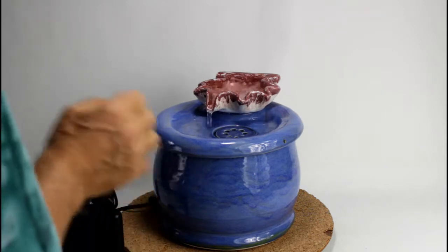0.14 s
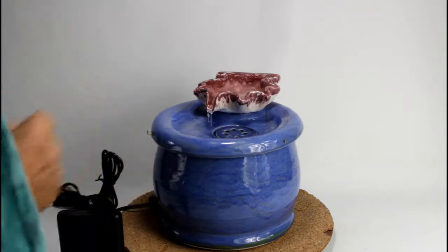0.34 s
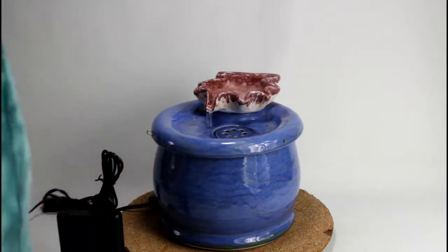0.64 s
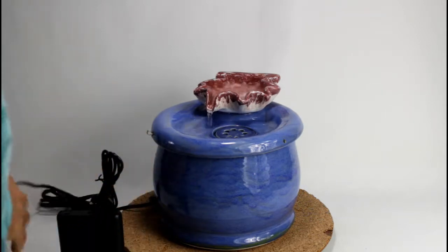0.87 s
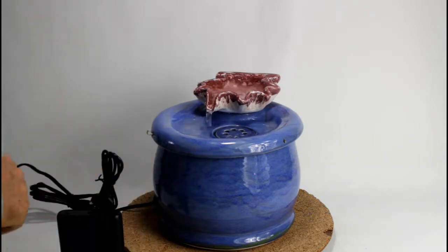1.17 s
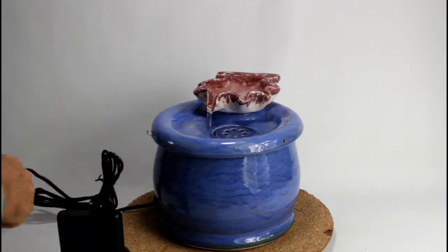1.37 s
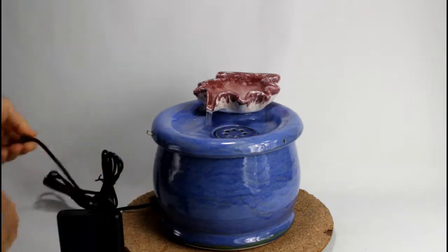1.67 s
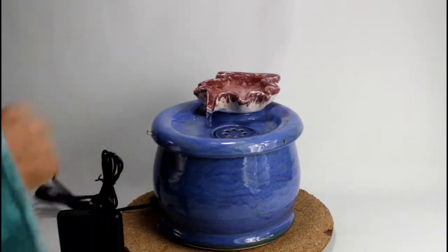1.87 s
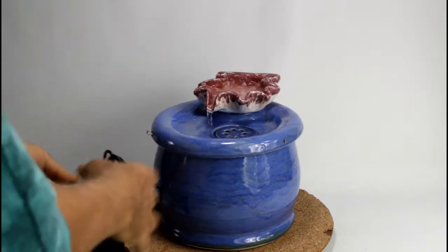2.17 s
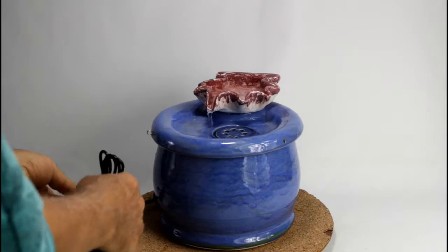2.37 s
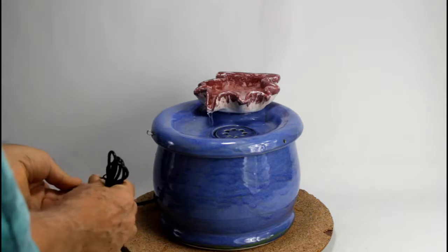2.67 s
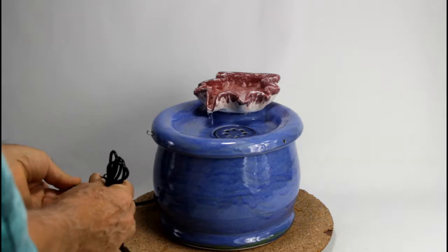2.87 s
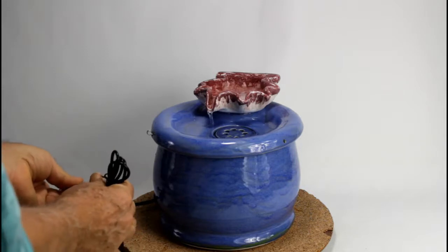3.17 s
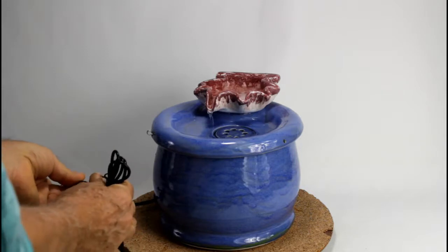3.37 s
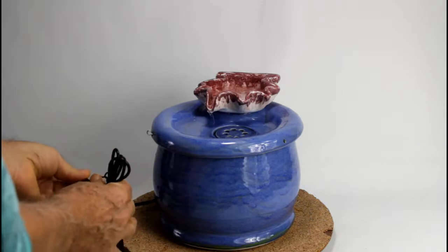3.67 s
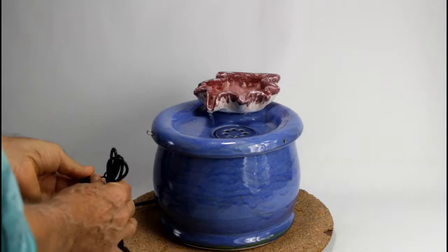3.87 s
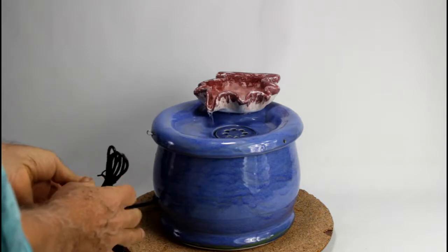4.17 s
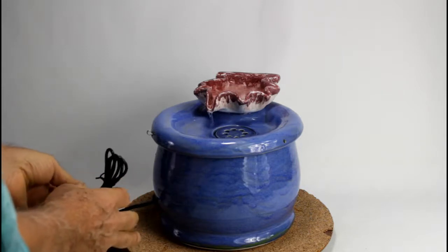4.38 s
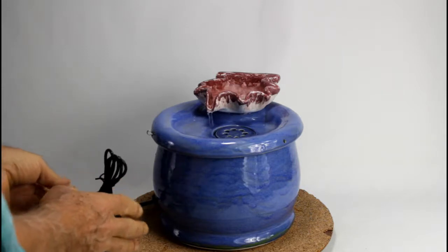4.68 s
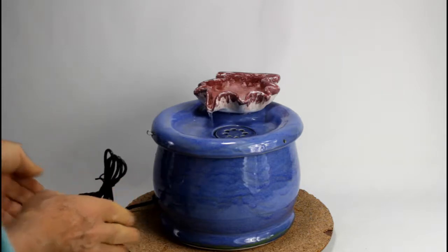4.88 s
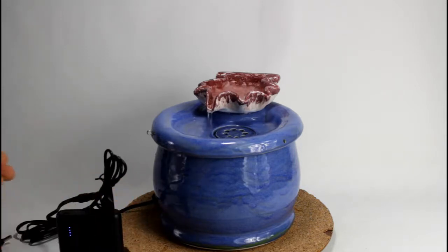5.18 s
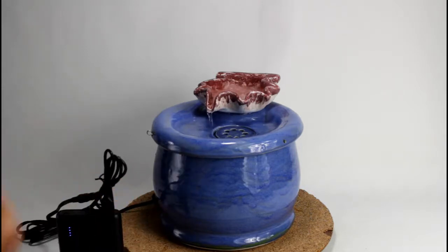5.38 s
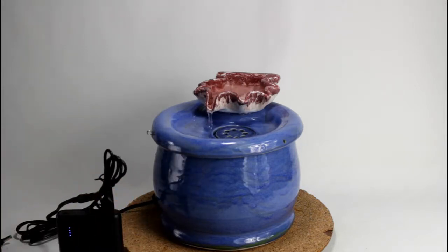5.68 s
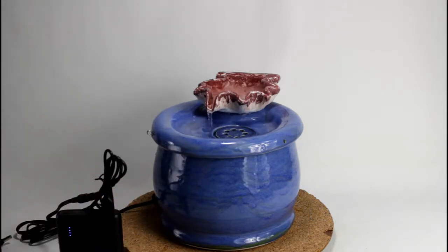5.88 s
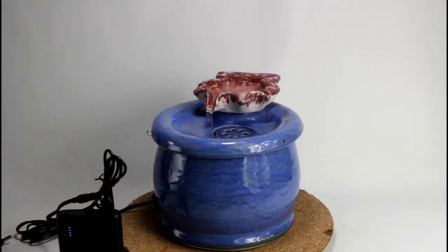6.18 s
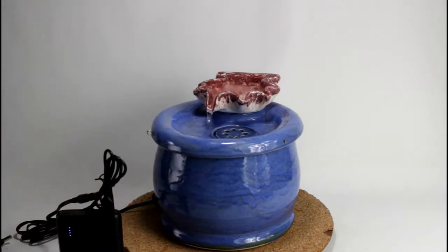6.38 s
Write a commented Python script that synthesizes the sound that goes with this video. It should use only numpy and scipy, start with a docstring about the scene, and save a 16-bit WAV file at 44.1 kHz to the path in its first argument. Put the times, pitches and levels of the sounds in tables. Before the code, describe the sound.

Water drips and trickles lightly into a small ceramic fountain while a cable and adapter are handled with knocks, clicks and rustles.

```python
"""Drops tap the glazed bowl of a small ceramic fountain on a table in a quiet room. Each impact excites
the bowl's normal modes and a small bubble, while a faint trickle keeps the same modes in forced vibration.
A hand shifts a cable and its adapter, which tick, knock and scrape, ringing the table top; a sleeve
rustles by friction. A low hum and the microphone's hiss lie underneath."""
import sys
import numpy as np
from scipy import signal
from scipy.fft import rfft, irfft, next_fast_len
from scipy.io import wavfile
from scipy.ndimage import map_coordinates

SR = 44100
rng = np.random.default_rng(int(sys.argv[2]) if len(sys.argv) > 2 else 0)


def file_out(sig):
    """Save sig as 16-bit WAV at sys.argv[1]."""
    # one column per channel
    cols = np.atleast_2d(sig).T
    # limit, then scale
    lim = np.clip(cols, -1, 1)
    pcm = np.round(lim * 32767).astype(np.int16)
    wavfile.write(sys.argv[1], SR, pcm)


N = 288414

# normal modes of the bowl: f/Hz, nominal bandwidth/Hz, relative level/dB
BOWL_MODES = [(930, 46, -22), (1918, 88, -2), (2273, 24, -8.5), (2754, 24, -4.5), (3040, 30, -7),
              (3233, 25, -4), (3513, 51, 3), (4040, 32, 1), (5200, 33, -3), (6030, 21, -15),
              (6570, 37, -23), (7180, 49, -7)]
# the thin stream running over the bowl: t/s, level/dB
STREAM_LEVELS = [(0, -79), (2.2, -70.5), (2.4, -74), (3.0, -74), (3.6, -80), (4.2, -83), (5.2, -74),
                 (5.6, -68), (6.0, -65), (6.2, -75), (6.54, -65)]


def amp(db):
    """Amplitude ratio of a level in dB."""
    return 10 ** (np.asarray(db) / 20)


def unit(x):
    """Normalisation to rms 1."""
    return x / np.sqrt(np.mean(x ** 2) + 1e-20)


def along(points, hz):
    """Interpolation of (f/Hz, value) points on a logarithmic frequency axis."""
    f, values = np.transpose(points)
    return np.interp(np.log(hz + 1), np.log(f + 1), values)


def wobble(rate):
    """Smooth random modulation: a spline through `rate` knots a second."""
    return map_coordinates(rng.standard_normal(int(N * rate / SR) + 4), [np.arange(N) * rate / SR])


def filtered(x, response):
    """Linear filtering: the spectrum of x times a frequency response."""
    size = next_fast_len(len(x) + SR // 2)
    return irfft(rfft(x, size) * response(np.fft.rfftfreq(size, 1 / SR)), size)[:len(x)]


def noise(spectrum):
    """Stationary noise of rms 1, shaped by (f/Hz, level/dB) points."""
    return unit(filtered(rng.standard_normal(N), lambda hz: amp(along(spectrum, hz))))


def near(hz, centre_hz, octaves):
    """Gaussian weight about a centre on a logarithmic frequency axis."""
    return np.exp(-.5 * (np.log2((hz + 1) / centre_hz) / np.maximum(octaves, .03)) ** 2)


def burst(t, centre_hz, octaves, rise_s, t60):
    """A transient: band noise with exponential rise and decay."""
    band = unit(filtered(rng.standard_normal(len(t)), lambda hz: near(hz, centre_hz, octaves)))
    return band * (1 - np.exp(-t / max(rise_s, 1e-4))) * amp(-60 * t / max(t60, .004))


def add(track, start_s, sound, peak_db):
    """Superposition of a sound on the track at a given peak level."""
    track[round(start_s * SR):][:len(sound)] += amp(peak_db) * sound / np.abs(sound).max()


def hum_and_hiss():
    """Noise floor: low tones modulated in amplitude and phase, and broadband hiss."""
    # partials of the hum: f/Hz, base level/dB
    partials = [(37.7, -70.5), (75.4, -73.5), (296.1, -78)]
    # noise of room and microphone: f/Hz, relative spectrum level/dB
    hiss_spectrum = [(15, -37), (25, -15), (36, 0), (52, -9), (75, -4.5), (200, -4), (300, -14.5),
                     (1000, -11.5), (2500, -14.5), (5000, -14.5), (9000, -18.5), (15700, -18)]
    t = np.arange(N) / SR
    hum = sum(amp(db + 2.5 + 3.2 * wobble(9)) * np.sin(2 * np.pi * hz * t + 1.3 * wobble(9))
              for hz, db in partials)
    return hum + amp(-57 + 0.1 * wobble(2.6)) * noise(hiss_spectrum)


def reverberation(x, block=SR // 4):
    """Convolution with a decaying room response, new for each block as the hands move."""
    # reverberation time of the room: f/Hz, T60/s
    decay_times = [(200, 0.33), (600, 0.26), (1500, 0.28), (4000, 0.28), (12000, 0.18)]
    track = np.zeros(N + SR)
    for start in range(0, N, block):
        hz, t, spectra = signal.stft(rng.standard_normal(SR // 2), SR, nperseg=256)
        decay = amp(-60 * t / along(decay_times, hz)[:, None])
        tail = signal.istft(spectra * decay, SR, nperseg=256)[1]
        echo = signal.fftconvolve(x[start:start + block], tail / np.linalg.norm(tail))
        track[start + 150:][:len(echo)] += echo
    return track[:N]


def rustle():
    """Sliding friction: sleeve and cable grip unevenly, giving a dull rub and short bright brushes."""
    # course of the rubbing: t/s, mean level/dB
    rub_levels = [(0, -60), (.18, -58.5), (.3, -52.5), (.5, -60), (.62, -46), (.7, -54), (.82, -58),
                  (.94, -52), (1.04, -61.5), (1.7, -58.5), (3.55, -59.5), (4.75, -61), (5.0, -56.5),
                  (5.55, -55), (5.7, -59), (6.54, -59)]
    # friction noise: f/Hz, relative spectrum level/dB
    rub_spectrum = [(120, -25), (250, -1), (800, -2.5), (2500, -6), (5000, -13), (12000, -24)]
    # quick brushes: middle t/s, peak level before modulation/dB, centre f/Hz
    strokes = [(.2, -51, 6100), (0.41, -43.5, 4970), (.641, -45, 6060), (0.75, -42, 4900), (.94, -55, 2900),
               (2.145, -48, 2400), (3.465, -53, 6000), (3.587, -49, 12000), (3.881, -47.5, 2980),
               (4.997, -49, 7940), (5.307, -46.5, 9000), (5.4, -47, 2600), (5.47, -45, 3000),
               (5.539, -46.5, 8000), (6.38, -46, 4900), (6.518, -53, 11000)]
    rub_db = np.interp(np.arange(N) / SR, *np.transpose(rub_levels))
    rub = amp(rub_db + 1.87 * wobble(30) + 1.26 * wobble(120)) * noise(rub_spectrum)
    half_s = .065
    brushes, t = np.zeros(N + SR), np.arange(int(2 * half_s * SR)) / SR
    for middle_s, db, hz in strokes:
        brush = burst(t, hz, octaves=1, rise_s=.001, t60=20) * np.hanning(len(t)) ** 2
        add(brushes, middle_s - half_s, brush, db)
    return rub + brushes[:N] * amp(1.7 * wobble(260))


def cable_ticks():
    """Damped transients of the stiff cable and its tie: the narrower the band, the longer the ring."""
    # sharp cracks: t/s, peak level/dB, centre f/Hz, spread/octaves
    cracks = [(1.4965, -42, 9000, 1.2), (1.5011, -25.5, 3900, 2.1), (1.5064, -32, 6960, 1.6),
              (1.759, -30.5, 2700, 0.93), (1.7674, -33, 8300, 0.59), (1.812, -42, 10000, 0.66),
              (1.8117, -15.5, 2380, 0.29), (1.814, -28, 3830, 0.77), (2.2615, -31.5, 4500, 0.69),
              (2.2657, -24.5, 1930, 0.67), (4.122, -43, 11500, .25), (4.129, -40.5, 3480, 0.72),
              (4.1294, -28.5, 2840, 0.082), (4.443, -35, 7550, 0.13), (4.443, -56, 1930, 0.1),
              (5.0784, -40.5, 4390, .1), (5.088, -38, 3430, .95), (2.645, -47, 13000, .4),
              (2.762, -47, 10000, 0.61), (3.525, -48.5, 8350, .2), (5.313, -43.5, 7000, 0.67),
              (5.465, -51, 7300, .1), (6.14, -44, 8000, .18), (6.209, -46, 8450, 0.28),
              (6.306, -41, 12000, .25), (6.3635, -40.5, 4470, 0.5)]
    track, t = np.zeros(N + SR), np.arange(SR // 4) / SR
    for s, db, hz, octaves in cracks:
        add(track, s, burst(t, hz, octaves, rise_s=0.00076, t60=0.019 + 12.5 / (hz * octaves)), db)
    return track[:N]


def table_response(contacts, rise_cycles, t60):
    """Modal excitation: a contact rings the table modes near its centre, with a scuff and a low thud."""
    # normal modes of the table top: f/Hz, relative level/dB, free T60/s
    table_modes = [(249.6, 1, 0.46), (369, 11.5, 0.038), (520, -12, 0.079), (676, -13, 0.1), (755, -3, 0.3),
                   (858, -6.5, 0.16), (1035, -14, 0.52), (1074, -42, 0.58), (1184, -21, 0.17),
                   (1450, -10.5, 0.096), (1490, -3.5, 0.3), (1596, -1.5, 0.093), (1757, -15, 0.32),
                   (1848, -2, 0.25), (2090, -34, 0.059), (2377, -22.5, 0.13), (2440, -8, 0.23),
                   (2580, -36, 0.17), (2480, -29, 0.18), (2980, -25, 0.18)]
    f, level, free_t60 = np.transpose(table_modes)[:, :, None]
    damping = 1 / free_t60 + 1 / t60  # the hand damps the top
    track, t = np.zeros(N + SR), np.arange(SR // 3) / SR
    for s, db, hz, octaves, thud_db in contacts:
        rise_s = rise_cycles / hz
        strength = amp(level + rng.normal(0, 2.5, f.shape)) * near(f, hz, octaves)
        phase = rng.uniform(0, 2 * np.pi, f.shape)
        ring = (strength * amp(-60 * t * damping) * np.sin(2 * np.pi * f * t + phase)).sum(0)
        chatter = np.interp(t, t[::200], rng.standard_normal(len(t[::200])))  # uneven sliding grip
        ring = ring * (1 - np.exp(-t / rise_s)) * amp(3.8 * chatter)
        scuff = 0.96 * burst(t, hz, 0.82 * octaves, rise_s, t60)
        add(track, s, ring / np.abs(ring).max() + scuff, db)
        thud = burst(t, centre_hz=306, octaves=0.87, rise_s=rise_s, t60=0.12)
        add(track, s, thud, thud_db)
    return track[:N]


def scrapes():
    """Frictional excitation: the dragged adapter builds up the table's vibration gradually."""
    # drags: t/s, peak level/dB, centre f/Hz, spread/octaves, thud level/dB
    drags = [(.532, -36.5, 860, 0.089, -41.5), (.56, -39, 1490, .31, -43), (.64, -53, 1100, 0.63, -44.5),
             (.705, -38.5, 890, 0.44, -43.5), (.805, -49.5, 680, 0.053, -49)]
    return table_response(drags, rise_cycles=20, t60=.24)


def knocks():
    """Impulsive excitation: cable and adapter strike the table, which responds within a few cycles."""
    # impacts: t/s, peak level/dB, centre f/Hz, spread/octaves, thud level/dB
    impacts = [(.245, -42, 603, .7, -50), (.264, -21.5, 1270, 0.77, -30.5), (.354, -25, 560, 0.97, -32.5),
               (.395, -32, 800, 1.34, -36.5), (.596, -31.5, 900, 0.18, -50),
               (.738, -31.5, 1590, 0.29, -40.5), (.932, -42.5, 660, 0.053, -40.5),
               (1.0, -46, 1170, 0.31, -52), (1.777, -31, 724, 1.13, -50), (1.812, -8, 1120, 0.89, -41),
               (1.8211, -15.5, 780, 0.97, -47), (1.848, -24.5, 1270, 0.65, -63),
               (2.135, -51, 292, 0.2, -54), (2.277, -38, 353, 1.1, -41.5), (4.209, -54, 394, 0.57, -48.5),
               (5.106, -46.5, 390, 0.19, -47), (5.508, -39, 623, 1.1, -42), (5.605, -49.5, 293, .55, -48.5)]
    return table_response(impacts, rise_cycles=2.23, t60=0.084)


def trickle():
    """Forced vibration: the unsteady stream keeps the bowl's resonances faintly ringing."""
    def bowl_response(f):
        return sum((-1) ** k * amp(level) * 1j * f * width / (f0 * f0 - f * f + 1j * f * width)
                   for k, (f0, width, level) in enumerate(BOWL_MODES))

    stream = amp(6.6 * wobble(25)) * rng.standard_normal(N)
    ring = filtered(filtered(stream, bowl_response), bowl_response)  # two passes sharpen the peaks
    return amp(np.interp(np.arange(N) / SR, *np.transpose(STREAM_LEVELS))) * unit(ring)


def drop(t, hz, reach_octaves):
    """Free vibration after impact: bowl modes near hz and a bubble of rising pitch, with a splash."""
    f, width, level = np.transpose(BOWL_MODES)[:, :, None]
    strength = amp(.5 * level + rng.normal(0, 3, f.shape)) * (near(f, hz, reach_octaves) + .015)
    phase = rng.uniform(0, 2 * np.pi, f.shape)
    modes = strength * np.exp(-np.pi * .8 * width * t) * np.sin(2 * np.pi * f * t + phase)
    life_s = 14 / hz  # the bubble falls to 1/e in about 14 cycles
    bubble = 0.74 * np.exp(-t / life_s) * np.sin(2 * np.pi * hz * (t + 0.036 * t * t / life_s))
    splash = 0.37 * burst(t, hz, 1.38 * reach_octaves, rise_s=0.00025, t60=0.075)
    attack = 1 - np.exp(-t / .0015)
    return (modes.sum(0) / strength.max() + bubble) * attack + splash


def fountain_drops():
    """Superposed impacts: clear drops, and faint random ones that swell with the stream."""
    # clear drops on the bowl: t/s, peak level/dB, pitch f/Hz
    clear_drops = [(.052, -52, 3950), (0.123, -45, 3040), (.193, -48.5, 7200), (.209, -43, 3620),
                   (.595, -49, 3920), (1.4227, -46.5, 5280), (1.484, -44, 5100), (1.574, -49, 6900),
                   (2.123, -49.5, 3140), (2.1594, -47, 2160), (2.2794, -46.5, 2000), (2.316, -38, 2120),
                   (2.3485, -45.5, 3740), (2.468, -39.5, 3300), (2.535, -37.5, 2125), (2.595, -47.5, 1910),
                   (2.642, -49, 2370), (2.644, -53, 6000), (2.6464, -41.5, 1530), (2.746, -48, 3600),
                   (2.746, -49.5, 6800), (2.81, -52, 6300), (2.815, -42.5, 2360), (2.848, -42, 1980),
                   (2.885, -43.5, 2280), (2.9, -43, 3450), (2.903, -50, 5200), (3.181, -43.5, 3070),
                   (3.3144, -49.5, 3460), (3.4067, -44, 2210), (3.4526, -44, 3260), (3.455, -49, 7190),
                   (3.571, -48, 1650), (3.7957, -42, 7000), (3.9594, -51, 2290), (5.479, -48, 2230),
                   (5.574, -45, 3560), (5.612, -44, 5000), (5.615, -48, 3500), (5.6494, -50.5, 3530),
                   (5.7158, -42, 2210), (5.751, -54, 2270), (5.827, -49, 3730), (5.8522, -39.5, 3560),
                   (5.9402, -51, 1800), (6.0516, -42.5, 3500), (6.056, -46, 6040), (6.11, -44, 3450),
                   (6.15, -53, 926), (6.1694, -48, 2250), (6.2, -52, 2270), (6.217, -42, 3780),
                   (6.2694, -49, 2250), (6.32, -43.5, 2430), (6.331, -51, 875), (6.359, -38.5, 3080),
                   (6.362, -47, 5230), (6.375, -41.5, 2340), (6.43, -46, 2300), (6.497, -45.5, 2400)]
    track, t = np.zeros(N + SR), np.arange(SR // 5) / SR
    for s, db, hz in clear_drops:
        add(track, s, drop(t, hz, reach_octaves=0.13), db)
    flow_s, flow_db = np.transpose(STREAM_LEVELS)
    for when, pitch, size in rng.random((120, 3)):
        s, hz = when * N / SR, 900 * 2 ** (3 * pitch)
        swell_db = 0.5 * (np.interp(s, flow_s, flow_db) - flow_db.mean())
        add(track, s, drop(t, hz, reach_octaves=0.15), -65 + 11.5 * size + swell_db)
    return track[:N]


def scene():
    """Superposition of direct sound, reverberation and noise floor in one channel."""
    water = fountain_drops() + trickle()
    handling = knocks() + scrapes() + cable_ticks()
    echo = reverberation(amp(-5) * water + amp(-6) * handling)
    return (water + handling + echo + rustle() + hum_and_hiss())[None]


def record(dry):
    """Band limiting by an ideal low-pass filter, plus a small constant offset."""
    cutoff_hz, offset = 15830, .001
    return filtered(dry[0], lambda hz: hz < cutoff_hz)[None] + offset


dry = scene()
out = record(dry)
file_out(out)
```